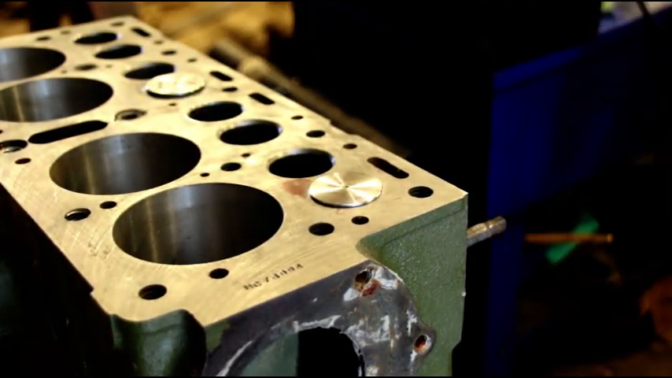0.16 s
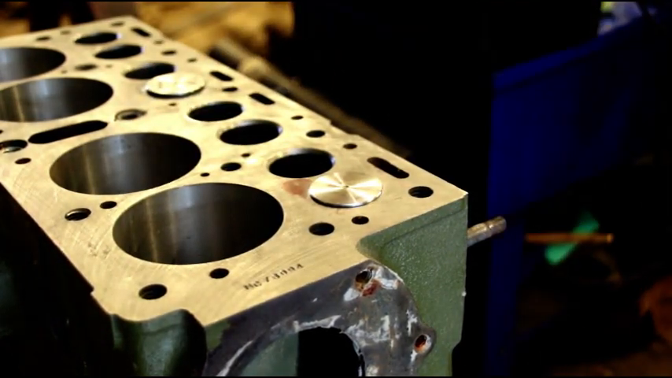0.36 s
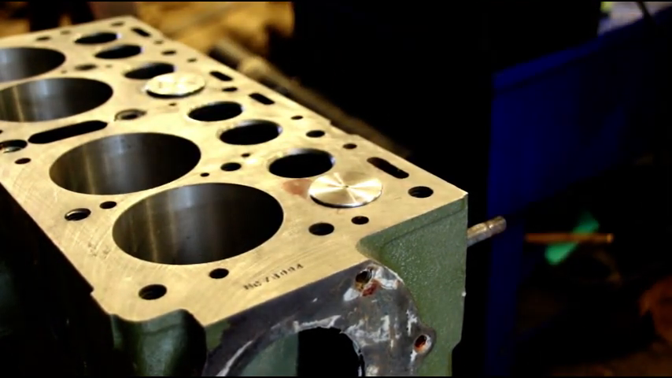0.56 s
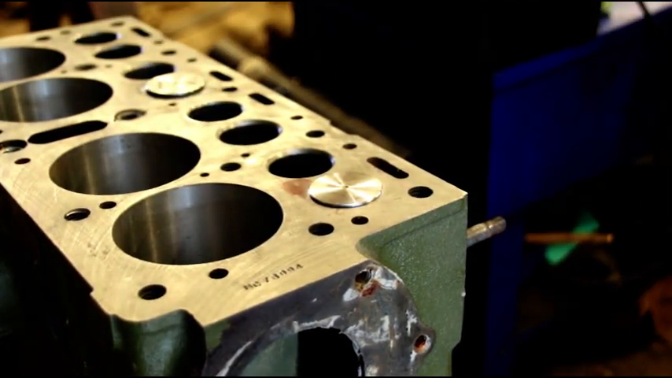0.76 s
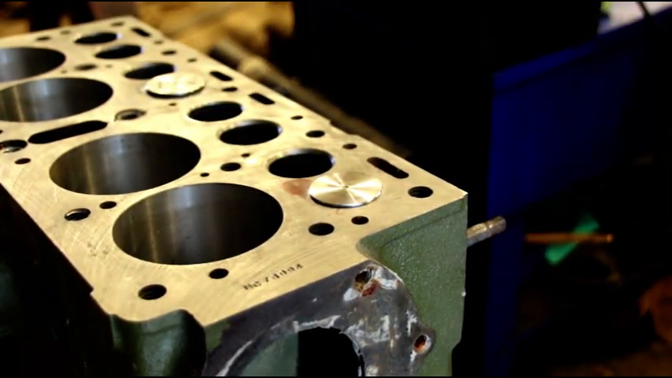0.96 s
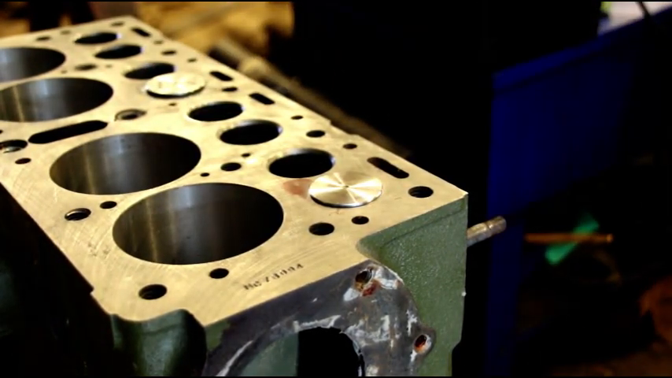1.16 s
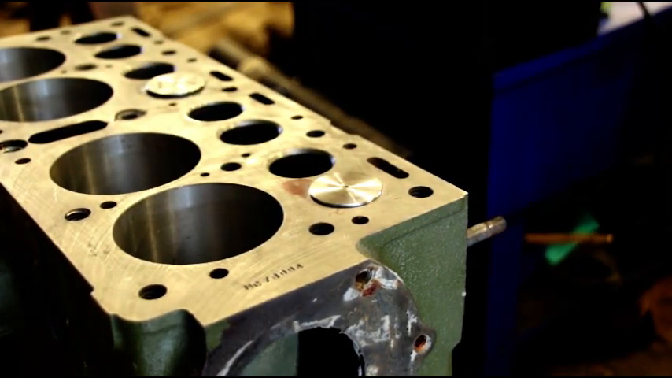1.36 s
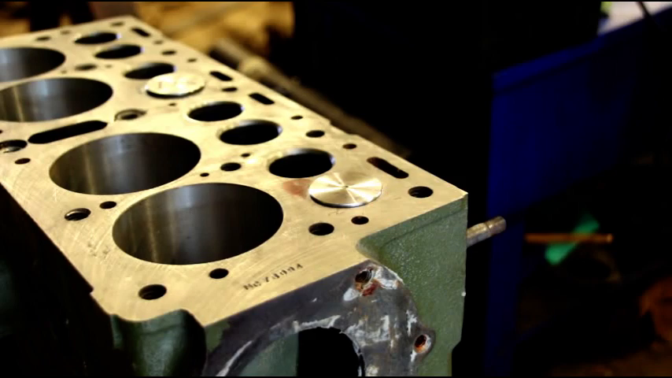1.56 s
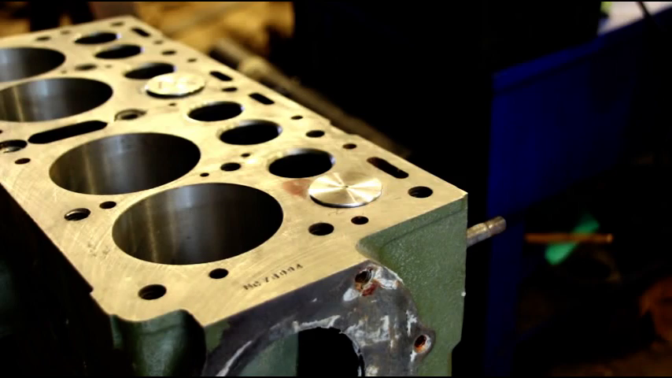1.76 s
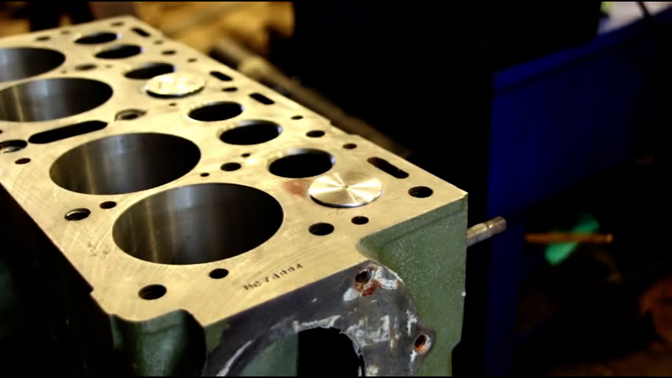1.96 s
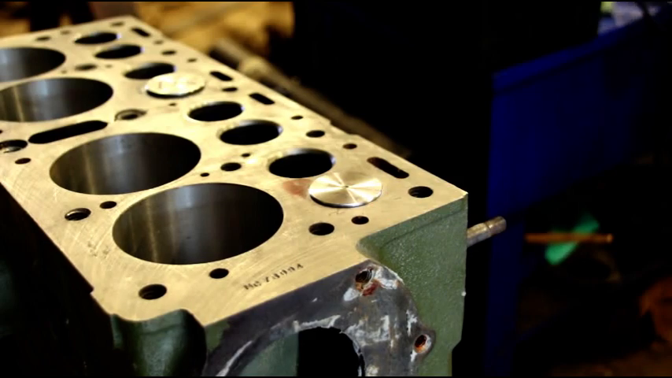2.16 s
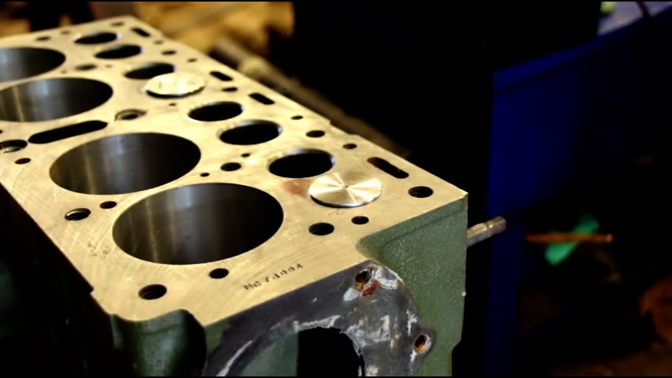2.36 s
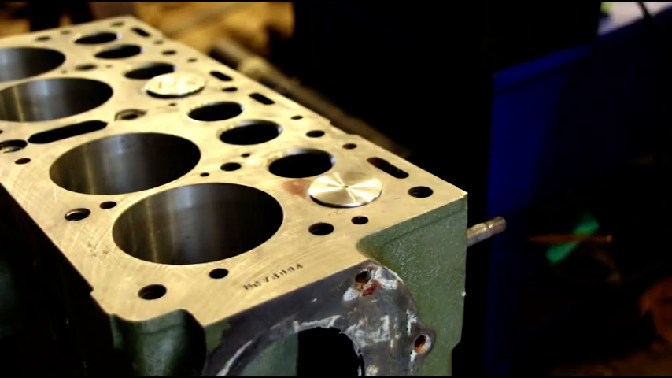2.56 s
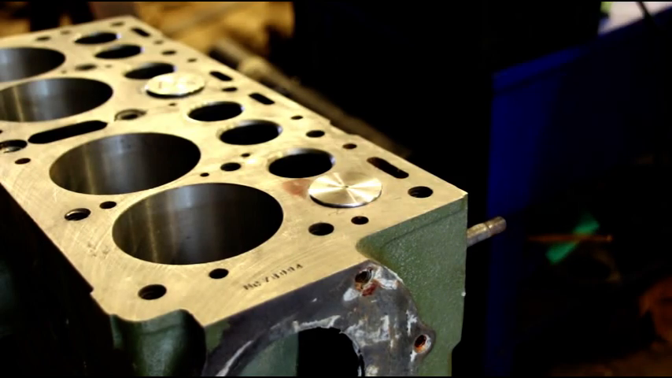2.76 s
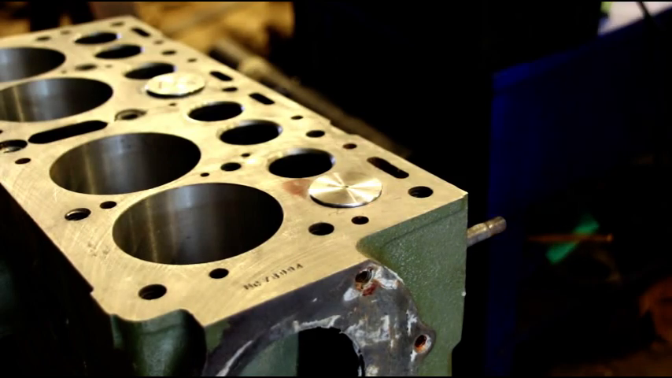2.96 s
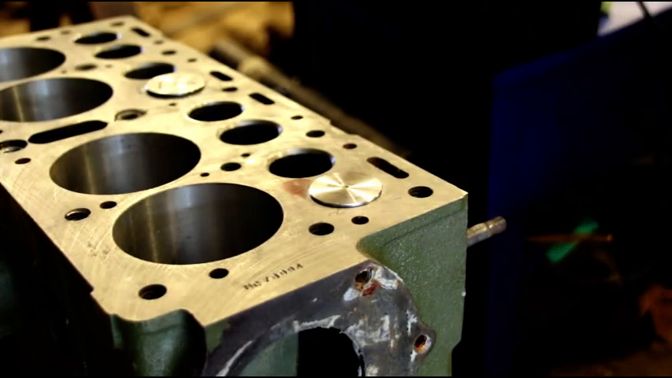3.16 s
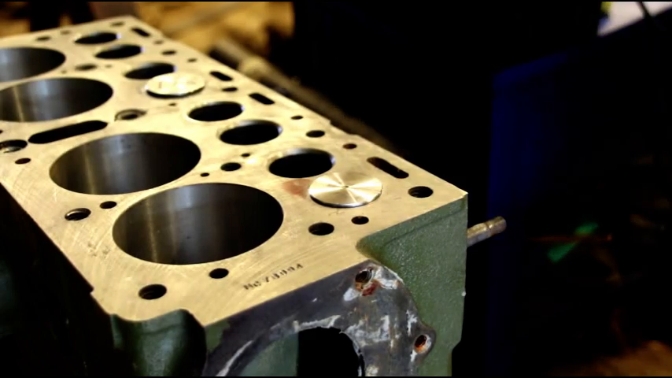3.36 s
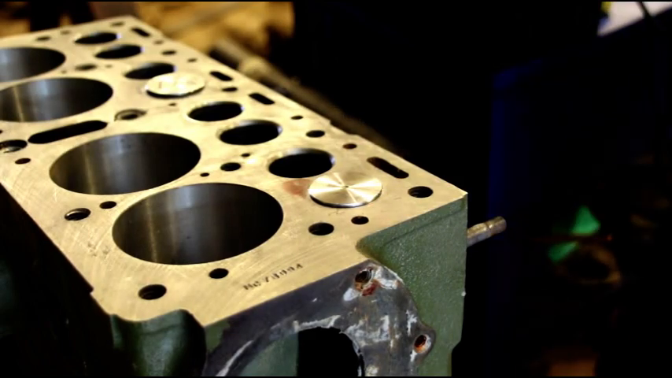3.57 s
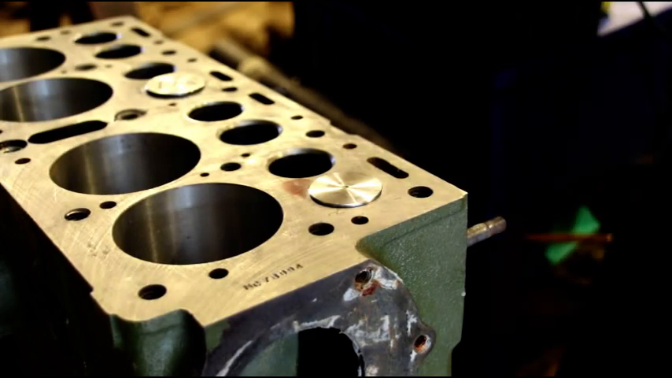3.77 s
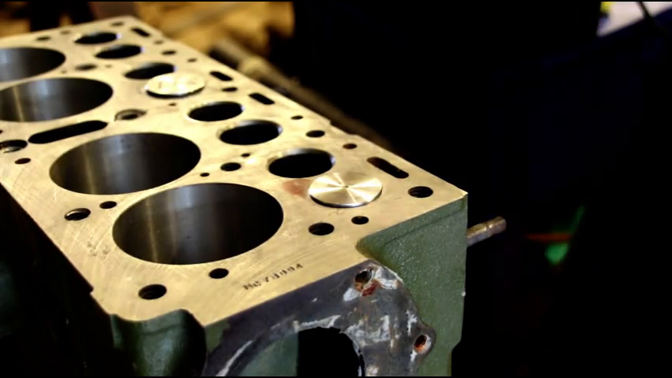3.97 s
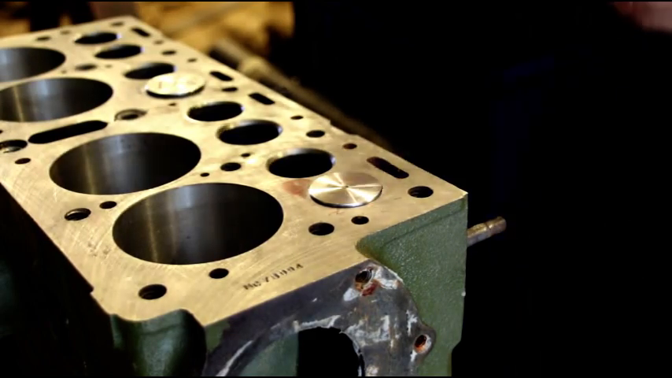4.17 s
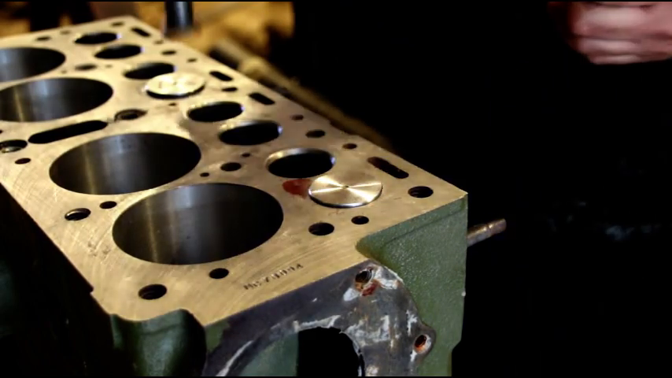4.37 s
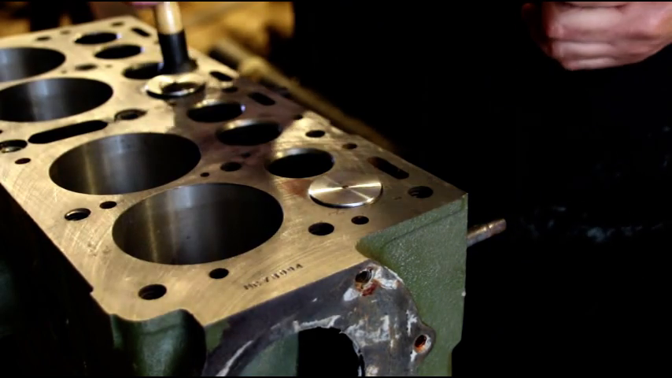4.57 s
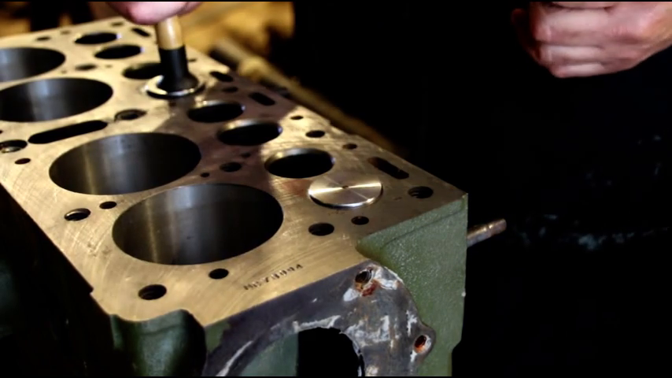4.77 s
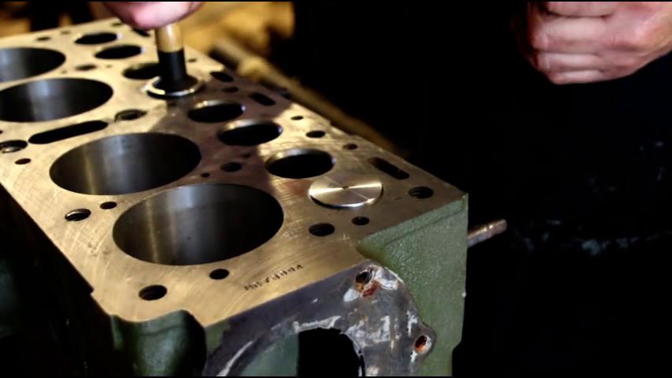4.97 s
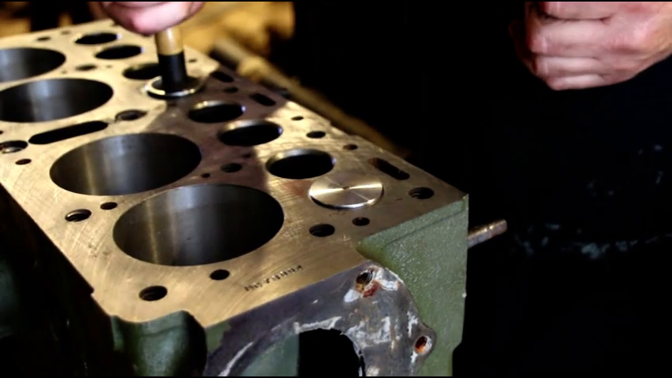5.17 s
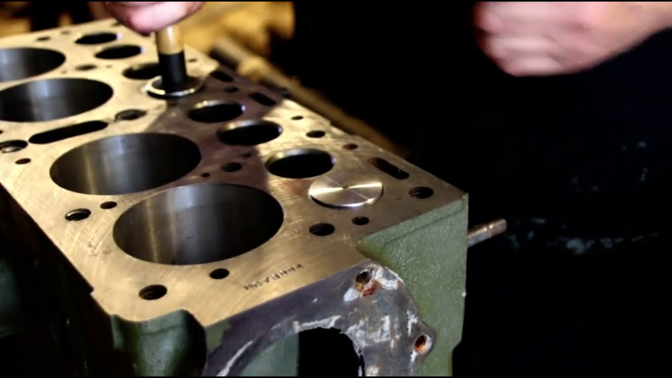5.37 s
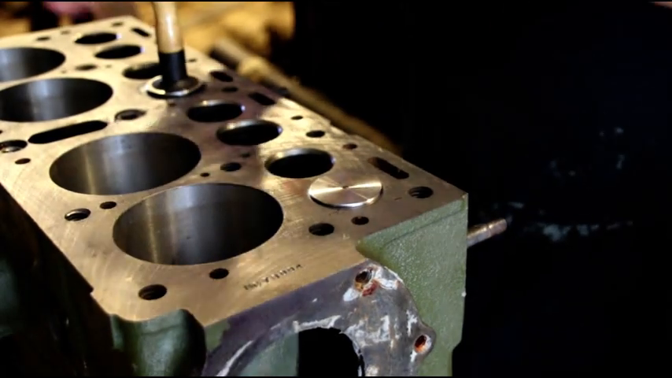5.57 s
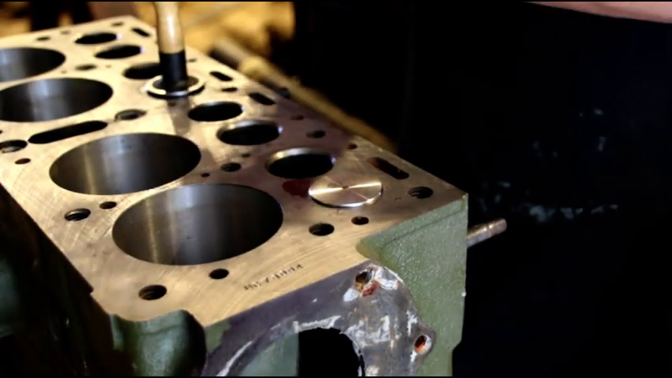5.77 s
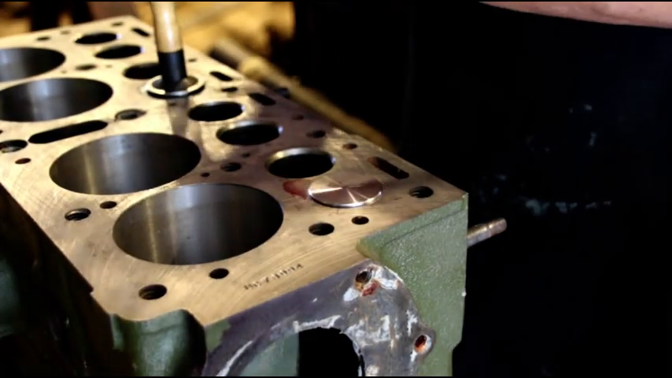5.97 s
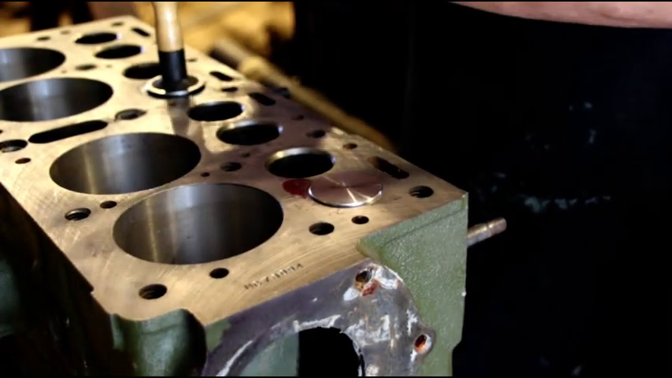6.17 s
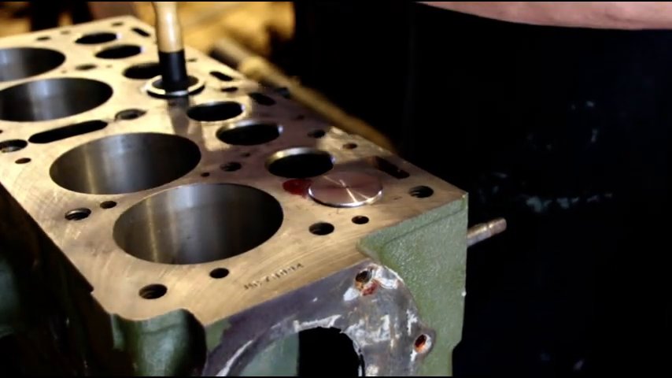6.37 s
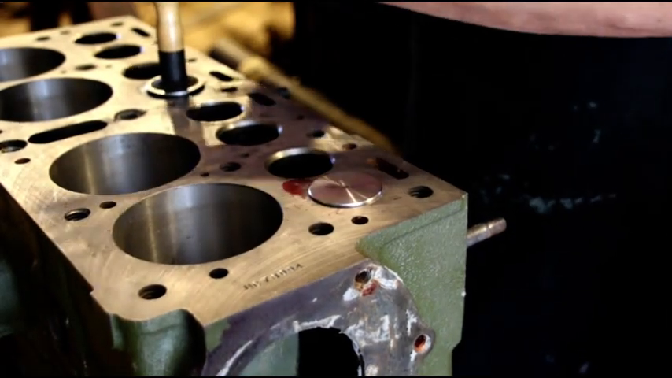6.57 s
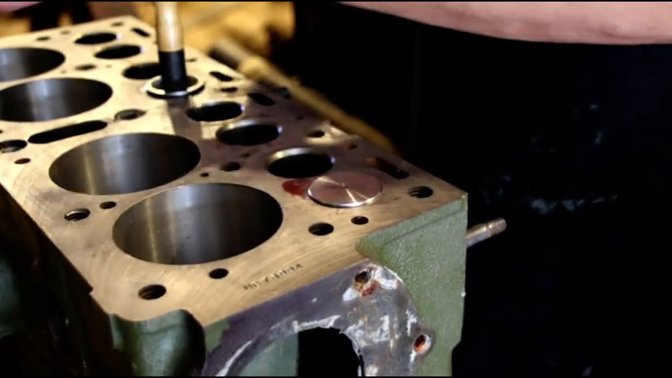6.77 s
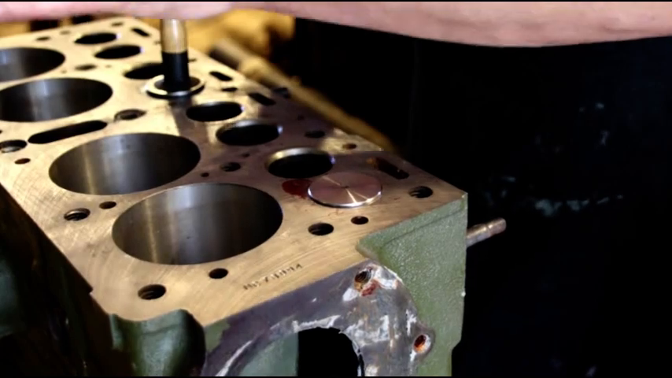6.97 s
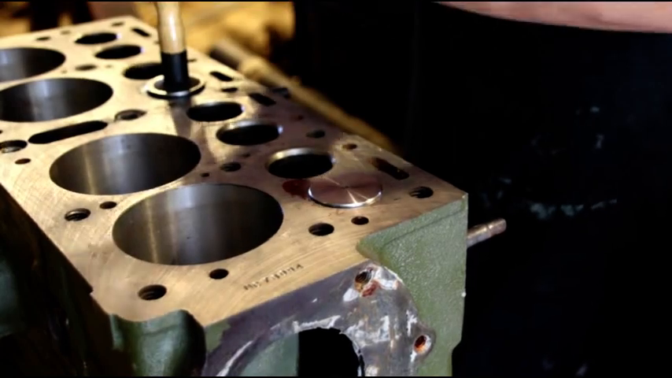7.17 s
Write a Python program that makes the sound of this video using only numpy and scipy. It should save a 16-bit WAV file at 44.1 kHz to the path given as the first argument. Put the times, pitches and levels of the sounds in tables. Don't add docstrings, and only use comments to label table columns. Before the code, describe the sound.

In a quiet engine shop, a sharp metallic clatter, sparse knocks and cloth brushes, then rapid coarse grinding strokes ringing an iron block.

```python
import sys
import numpy as np
from scipy import signal
from scipy.fft import rfft, irfft, next_fast_len
from scipy.io import wavfile
from scipy.ndimage import uniform_filter1d

SR = 44100
rng = np.random.default_rng(int(sys.argv[2]) if len(sys.argv) > 2 else 0)


def magnitude_from_level(level_db):
    exponent = np.asarray(level_db, float) / 20
    return 10 ** exponent


def to_wav(s):
    ch = np.atleast_2d(s).T
    pcm = np.round(np.clip(ch, -1, 1) * 32767)
    wavfile.write(sys.argv[1], SR, pcm.astype(np.int16))


N = 318843
TIME = np.arange(N) / SR


def level(x, db):
    return x * magnitude_from_level(db) / np.sqrt(np.mean(x ** 2))


def colour(x, table):
    hz, db = np.transpose(table)
    size = next_fast_len(len(x))
    log_hz = np.log(np.arange(size // 2 + 1) * SR / size + 1)
    gain = magnitude_from_level(np.interp(log_hz, np.log(hz), db))
    return irfft(rfft(x, size) * gain, size)[:len(x)]


def ring(x, hz, width_hz):
    return signal.lfilter(*signal.iirpeak(hz, hz / width_hz, fs=SR), x)


def band(x, low_hz, high_hz, order=2):
    sections = signal.butter(order, (low_hz, high_hz), "band", fs=SR, output="sos")
    return signal.sosfilt(sections, x)


def walk(rate_hz):
    k = int(SR / rate_hz)
    steps = np.repeat(rng.standard_normal(N // k + 1), k)
    slow = uniform_filter1d(uniform_filter1d(steps, k), k)[:N]
    return slow / slow.std()


def grit(spread_db):
    grains = rng.standard_normal(N)
    size_db = spread_db * np.minimum(rng.exponential(size=N), 4)
    return level(grains * magnitude_from_level(size_db), 0)


def swell(start, length):
    return np.sin(np.pi * np.clip((TIME - start) / length, 0, 1))


def settle(start, rise, t60):
    t = np.clip(TIME - start, 0, None)
    return (1 - np.exp(-t / rise)) * np.exp(-np.log(1000) * t / t60)


def knocks(table, click_db, rise_s, span, tick_db, length):
    size = 4096
    out, t = np.zeros(N + size), TIME[:size]
    for s, db, hz, thump_db in table:
        rattle = rng.standard_normal(size)
        force = rattle * (1 - np.exp(-t / rise_s)) * np.exp(-(t / np.clip(length, .001, .04)) ** 2.4)
        force[0] += magnitude_from_level(click_db)
        body = ring(band(force, hz / span, hz * span), hz, 0.62 * hz)
        thump = band(force, 160, 520)
        tick = band(force, 5250, 9060)
        i = int((s - rise_s / 2) * SR)
        for part, rel_db in [(body, 0), (thump, thump_db), (tick, tick_db)]:
            out[i:i + size] += part / np.abs(part).max() * magnitude_from_level(db + rel_db)
    return out[:N]


# frequency in Hz, density in dB per Hz.
SHOP_AIR = [(12, -39), (20, -5.5), (110, -1), (442, -1.5), (537, 4.5), (634, -0.5), (1730, -3),
            (3020, -14.5), (4990, -11.5), (7800, -11.5), (10600, -21.5), (14400, -27), (15700, -41)]


def shop():
    air = colour(rng.standard_normal(N), SHOP_AIR) * magnitude_from_level(0.25 * walk(2.9))
    drone = ring(rng.standard_normal(N), 541.6, 4.6) * magnitude_from_level(9.6 * walk(2.2))
    return level(air, -56.5) + level(drone, -74.5)


# time in seconds, level in dB.
BUSTLE = [(0.0, -48.5), (0.32, -52.5), (0.45, -53), (0.64, -47.5), (0.77, -53), (1.26, -51.5), (1.63, -56),
          (2.29, -57), (2.45, -54.5), (2.86, -54.5), (3.25, -49.5), (3.52, -57), (3.99, -56.5), (4.18, -48),
          (5.27, -59), (5.8, -54)]
# start in seconds, length in seconds, level in
# dB.
LOW_SWELLS = [
    (0.0, 0.17, -58.5),
    (0.394, .21, -41.5),
    (2.152, 0.31, -49.5),
    (2.414, 0.24, -48.5),
    (3.42, 0.21, -62.5),
    (4.247, 0.29, -57),
    (5.292, 0.42, -59.5),
]


def rustle():
    s, db = np.transpose(BUSTLE)
    grains, flicker = grit(2.1), magnitude_from_level(1.9 * walk(24.93))
    low = level(band(grains, 150, 1130), 0)
    mid = level(band(grains, 800, 3930), 0)
    high = level(band(grains, 4000, 9400), 0)
    cloth = magnitude_from_level(-11) * low + magnitude_from_level(-2.5) * mid + magnitude_from_level(-12.5) * high
    bustle = magnitude_from_level(np.interp(TIME, s, db, right=-70))
    swelling = sum(magnitude_from_level(swell_db) * swell(start, length) for start, length, swell_db in LOW_SWELLS)
    return flicker * (cloth * bustle + low * swelling)


# time in seconds, peak in dB, body in Hz, thump in dB re body.
THUDS = [(0.273, -24, 3000, -7.5), (1.99, -46.5, 970, -18), (2.178, -54, 1010, -8),
         (2.255, -28.5, 2300, -1.5), (2.263, -28, 850, -31), (2.271, -39, 770, 7), (2.383, -36, 2230, -2.5),
         (2.394, -34.5, 1220, -0.5), (2.468, -27.5, 1800, -4), (2.524, -47, 1950, -16),
         (2.569, -37, 930, 0.5), (2.745, -39, 2210, -16), (3.002, -39.5, 1840, -18), (4.646, -49, 1740, 1),
         (5.008, -39, 1500, -16), (5.683, -55, 1230, -6)]


def thuds():
    return knocks(THUDS, click_db=-6.0, rise_s=0.0065, span=2.18, tick_db=-37, length=0.014)


# time in seconds, peak in dB, body in Hz, thump in dB re body.
PRESSES = [
    (0.284, -22.5, 1450, -7),
    (1.013, -40.5, 910, 3),
    (1.37, -47, 1090, 6.5),
    (3.476, -43.5, 1820, -3.5),
    (3.995, -43, 912, -14),
    (4.579, -29, 740, -5.5),
    (4.591, -25.5, 1580, -6),
    (4.603, -24, 950, -15),
]


def presses():
    return knocks(PRESSES, click_db=-13.0, rise_s=0.0065, span=2.5, tick_db=-4, length=0.0078)


# time in seconds, level in dB.
STEPS = [(0.33, -56), (0.47, -57), (0.95, -66), (1.3, -62), (2.24, -53), (2.55, -56), (3.02, -55),
         (3.2, -66), (3.65, -66), (4.04, -56), (4.15, -63), (4.36, -67), (4.55, -50)]


def floorboards():
    load = magnitude_from_level(-75.5)
    for s, db in STEPS:
        load = load + magnitude_from_level(db) * settle(s, rise=0.028, t60=0.44)
    return level(band(rng.standard_normal(N), 60, 154, order=3), 0) * load


# time in seconds, peak in dB, body in Hz, thump in dB re body.
BLOWS = [
    (0.3424, -8.5, 2630, -12),
    (0.3723, -2.5, 3570, -17),
    (0.4749, -6, 2020, -14),
]


def blows():
    return knocks(BLOWS, click_db=14.0, rise_s=0.0003, span=3, tick_db=-9, length=.0015)


# time in seconds, peak in dB, body in Hz, thump in dB re body.
CRACKS = [
    (0.3445, -16, 1990, -10),
    (0.351, -15, 1890, -10),
    (0.3679, -17, 3920, -2),
    (0.3755, -13.5, 3000, -8.5),
    (0.384, -15.5, 2200, -6),
    (0.4775, -11, 1880, -9),
    (0.4835, -12.5, 1200, -4),
    (0.4902, -13, 1670, -29),
    (0.4994, -15, 1100, -9.5),
    (0.512, -20.5, 1880, -3),
]


def cracks():
    return knocks(CRACKS, click_db=12.0, rise_s=0.00044, span=1.9, tick_db=-12.5, length=0.0056)


# start in seconds, partial in Hz,
# level in dB, t60 in seconds, rise in seconds.
CLINKS = [(.908, 1830, -48, .2, .003), (.908, 4380, -55, .12, .003), (.908, 8150, -53, .25, .003),
          (.908, 13000, -62, .2, .003), (1.01, 930, -50, .15, .005), (1.12, 1500, -57, .25, .02),
          (1.5, 96, -59, 4., .1), (1.81, 6050, -56, .6, .04), (1.83, 2700, -60, .6, .04),
          (1.82, 5400, -63, .3, .02), (1.99, 930, -53, .25, .01), (2.38, 5250, -59, .3, .01),
          (2.38, 8150, -59, .6, .04), (2.475, 2000, -43, .3, .015), (2.475, 2300, -45, .3, .01),
          (6.95, 1432, -45, 1.6, .02), (6.97, 1113, -35, .5, .01), (5.15, 330, -63, 3., .15)]


def clinks():
    out, waver = np.zeros(N), magnitude_from_level(1.8 * walk(90))
    for s, hz, db, t60, rise in CLINKS:
        out += magnitude_from_level(db) * waver * settle(s, rise, t60) * np.sin(2 * np.pi * hz * TIME)
    return out


# time in seconds, peak in dB, body in Hz, thump in dB re body.
TICKS = [(0.9108, -39, 1820, -22), (2.5696, -43, 1220, 3), (2.7217, -35, 2650, -14),
         (2.8085, -35, 2450, -14), (3.1074, -43, 2200, -9), (3.1827, -30, 3200, -28),
         (3.2041, -35.5, 2800, 1.5), (3.2455, -27.5, 4340, -28), (3.2974, -43, 3800, -11),
         (3.3463, -34, 3420, -17), (3.3513, -26, 3440, -28), (3.3694, -45, 2310, -22),
         (4.1454, -36, 2940, 5.5), (4.8514, -45, 1450, -18), (4.9801, -35.5, 1890, -11)]


def ticks():
    return knocks(TICKS, click_db=25.0, rise_s=0.00031, span=1.83, tick_db=-13, length=0.0048)


# start in seconds, length in seconds,
# level in dB, low edge in Hz, high edge in Hz.
BRUSHES = [
    (1.203, 0.27, -52.5, 800, 8550),
    (2.088, 0.02, -64, 7000, 12000),
    (2.134, 0.021, -59, 4000, 11000),
    (2.588, 0.1, -51.5, 3500, 9900),
    (2.71, .13, -51.5, 1500, 9850),
    (4.157, 0.28, -50, 864, 6230),
    (4.595, 0.14, -50, 700, 6000),
    (5.256, 0.044, -59.5, 7100, 11500),
    (5.394, 0.087, -58.5, 2000, 6000),
    (5.623, 0.55, -55.5, 3080, 8900),
]


def brushes():
    grains = grit(4.4)
    return sum(level(band(grains, low_hz, high_hz), db) * swell(s, length)
               for s, length, db, low_hz, high_hz in BRUSHES)


# time in seconds, peak in dB, body in Hz, thump in dB re body.
RAPS = [
    (3.0424, -24, 2420, -10.5),
    (3.0465, -26, 3100, -10.5),
    (4.0607, -25, 2580, -7),
    (4.0672, -20.5, 2540, -17.5),
    (4.0787, -25, 3360, -21),
    (4.5989, -22.5, 2360, -10.5),
    (4.6084, -22.5, 3500, -14),
    (4.6248, -27, 3450, -23),
]


def raps():
    return knocks(RAPS, click_db=18.0, rise_s=0.00084, span=3.36, tick_db=-23, length=0.0083)


# time in seconds, peak in dB, body in Hz, thump in dB re body.
SNAPS = [
    (3.1774, -38, 1840, -22),
    (3.2144, -37, 3200, -8),
    (3.6894, -46.5, 1450, 1),
    (3.9689, -40.5, 1760, -13),
    (5.221, -36, 3020, -22),
    (5.2314, -40, 2960, -26),
    (5.4834, -42.5, 2350, -10),
]


def snaps():
    return knocks(SNAPS, click_db=23.0, rise_s=0.00029, span=1.54, tick_db=1.5, length=0.0052)


# start in seconds, pressure in dB,
# place of top speed from 0 to 1.
STROKES = [(5.822, -12.5, 0.25), (5.919, -14, 0.37), (6.02, -11.5, 0.39), (6.129, -10.5, 0.28),
           (6.232, -14, 0.33), (6.337, -13, 0.33), (6.446, -17.5, 0.59), (6.549, -18, 0.38),
           (6.659, -18, 0.46), (6.767, -21.5, 0.31), (6.869, -19, 0.21), (6.983, -30, 0.2),
           (7.218, -5.5, 0.46), (7.31, -30, .5)]


def palm_strokes():
    speed, force, bright_db = np.zeros(N), np.zeros(N), np.zeros(N)
    for (s, db, top), (end, *_) in zip(STROKES, STROKES[1:]):
        if end - s > .15:
            continue
        u = np.clip((TIME - s) / (end - s), 0, 1)
        top = np.clip(top, .1, .9)
        turn = np.sin(np.pi / 2 * np.where(u < top, u / top, (1 - u) / (1 - top)))
        heavier_db = db + 15
        roundness = np.clip(0.88 + 0.12 * heavier_db, .3, 1)
        speed += turn
        force += magnitude_from_level(db) * turn ** roundness
        bright_db += (0.52 - 0.71 * heavier_db) * (turn > 0)
    return speed, force * magnitude_from_level(1.8 * walk(120)), bright_db


def bite(speed, force, bright_db):
    grains = grit(1.3)
    dull = signal.lfilter([.25], [1, -.75], grains)
    sharp = grains - dull
    return force * (dull + magnitude_from_level(2 * bright_db) * (speed + 0.08) ** 0.4 * sharp)


IRON_HZ = [470, 598, 1006, 1113, 1233, 1435, 1546, 1586, 1685, 1975, 2033, 2411, 2578, 2962, 3244, 3870,
           4375, 4590, 5715, 6410, 7270, 8280, 9460, 13050, 13290]
# width in Hz, level in dB.
IRON = [(25, -24.5), (62, -16.5), (22.1, -7.5), (19.3, 2), (32, -6), (18, -18), (27, -12), (29.8, -16),
        (22.2, -7.5), (22, -6), (25, -9), (35, -16.5), (29.2, -5.5), (34.2, -5.5), (35, -11.5), (40, -17),
        (60, -15.5), (59.5, -17), (30, -16), (50.3, -19), (200, -23.5), (302, -20), (149, -27.5),
        (130, -32), (220, -31)]
# frequency in Hz, density in dB per Hz.
PASTE = [(120, -74), (200, -35), (395, -24), (586, -26), (839, -10), (1100, -2), (1360, -1), (2640, -7),
         (2790, -8.5), (4520, -12), (6830, -20), (8170, -26), (10500, -31), (13500, -35), (14500, -52)]


def lapping():
    strokes = palm_strokes()
    spot, grains = magnitude_from_level(1.8 * walk(12)), bite(*strokes)
    iron = np.zeros(N)
    for k, (hz, (width_hz, db)) in enumerate(zip(IRON_HZ, IRON)):
        iron += (-1) ** k * magnitude_from_level(db) * ring(grains * np.roll(spot, 9001 * k), hz, width_hz)
    rasp = magnitude_from_level(17.5) * iron + magnitude_from_level(7.5) * colour(bite(*strokes), PASTE)
    low = colour(rasp, [(20, 0), (13600, 0), (14000, -2), (14250, -50), (SR / 2, -50)])
    patches = np.clip(2 * walk(30), 0, 1) * magnitude_from_level(3.0)
    return low + band(rasp, 13900, 14600, order=6) * patches


# band centre in Hz, t60 in seconds, level in dB.
ROOM = [(125, 0.37, -8), (300, 0.095, 2.5), (700, 0.25, 5), (1370, 0.33, -1.5), (2200, 0.39, 0),
        (3500, 0.63, -13), (6000, 0.7, -14.5), (10000, 0.25, 0)]


def room(x):
    t = TIME[:SR // 2]
    tail = np.zeros(len(t))
    for hz, t60, db in ROOM:
        noise = ring(rng.standard_normal(len(t)), hz, 0.79 * hz)
        tail += magnitude_from_level(db) * noise * np.exp(-np.log(1000) * t / t60)
    tail *= 1 - np.exp(-t / 0.00067)
    return signal.fftconvolve(x, tail / np.sqrt(np.sum(tail ** 2)))[:N]


# frequency in Hz, dB under the sum.
PORTS = [(60, -24), (200, -45), (1300, -52), (2400, -27), (4400, -20), (8100, -11), (15000, -5)]


def two_ports(mid):
    scatter = rng.standard_normal(2048) * np.exp(-TIME[:2048] / .006)
    stray = signal.fftconvolve(mid, scatter / np.sqrt(np.sum(scatter ** 2)))[:N]
    side = colour(stray * walk(60), PORTS)
    return np.array([mid + side, mid - side])


def scene():
    rasp = lapping()
    hard = cracks() + blows()
    soft = thuds() + presses()
    rapped = raps()
    small = ticks() + snaps()
    shaded = band(rasp, 310, 6800, order=1) * magnitude_from_level(3 * walk(50))
    tail = room(magnitude_from_level(-12) * shaded + magnitude_from_level(-6.0) * hard + magnitude_from_level(-2.5) * soft + magnitude_from_level(-8.5) * rapped + magnitude_from_level(-7.0) * small)
    near = rasp + hard + soft + rapped + small
    return two_ports(near + tail + clinks() + rustle() + brushes() + floorboards() + shop())


def roll_off(x):
    return signal.sosfilt(signal.butter(12, 15810, fs=SR, output="sos"), x)


def record(dry):
    power = uniform_filter1d(uniform_filter1d(dry.mean(axis=0) ** 2, size=200), size=200)
    loudness = np.sqrt(power + 1e-12)
    held = dry * np.minimum(1, magnitude_from_level(-13) / loudness) ** 0.27
    return roll_off(held)


dry = scene()
out = record(dry)
to_wav(out)
```